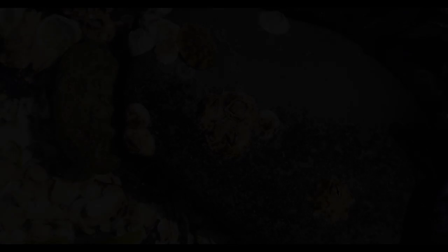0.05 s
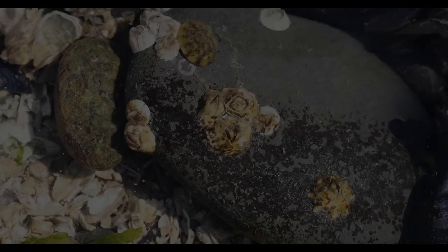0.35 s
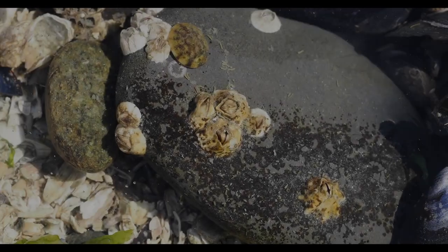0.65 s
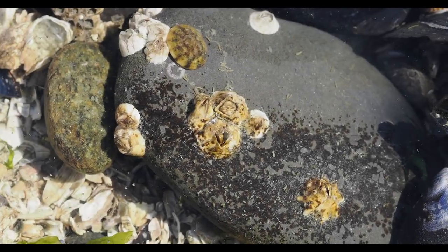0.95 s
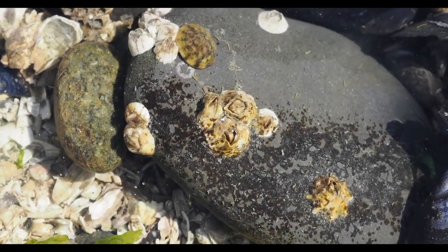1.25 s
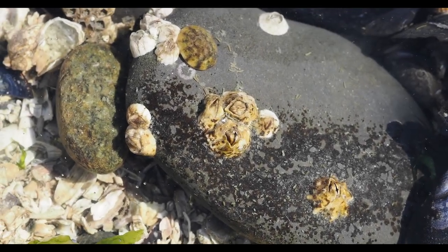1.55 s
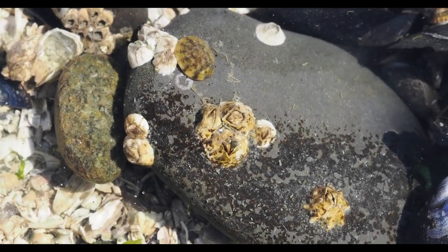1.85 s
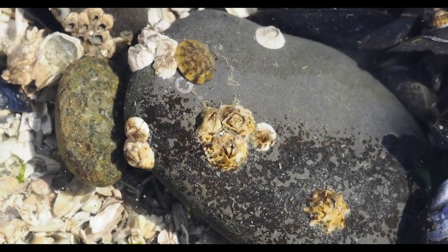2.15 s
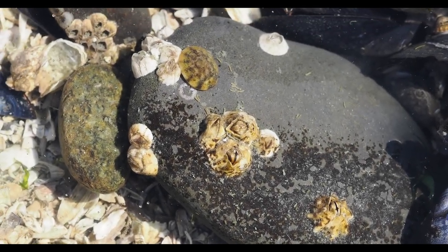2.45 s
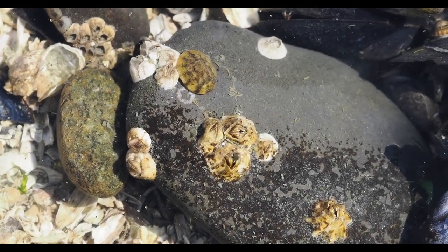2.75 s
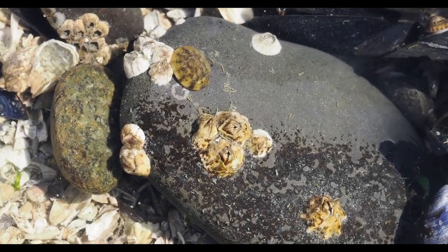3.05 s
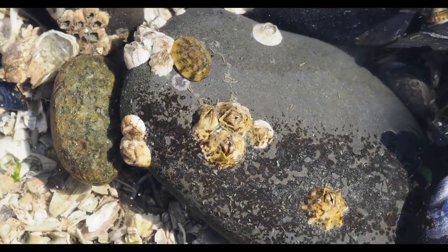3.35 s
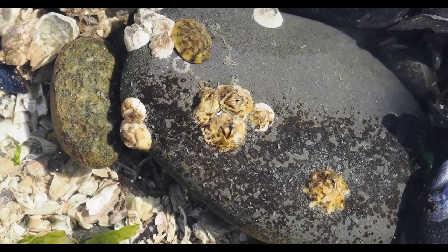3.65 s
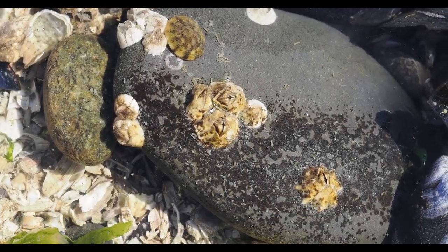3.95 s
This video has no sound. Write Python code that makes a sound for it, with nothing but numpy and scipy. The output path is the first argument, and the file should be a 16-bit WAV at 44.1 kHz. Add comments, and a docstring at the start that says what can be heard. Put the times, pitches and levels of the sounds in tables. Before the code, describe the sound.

A low wind rumble over distant sea and engine drone, with sparse clicks of wet shells.

```python
"""Wet shells click close by on a rocky shore at low tide, each a damped knock and a gritty snap, and a few
small pebbles rattle briefly with a ringing tone. Draining shells tick, fine bubbles burst in the grit, and
small waves wash softly between the stones. Light wind rumbles on the microphone, far engines drone under the
broadband rush of the sea, and a distant bird whistles once. The whole sound fades in over the first second."""
import sys
import numpy as np
from scipy import signal
from scipy.fft import rfft, irfft
from scipy.io import wavfile

SR = 44100
rng = np.random.default_rng(int(sys.argv[2]) if len(sys.argv) > 2 else 0)


def generate_wav(signal):
    """Clip the signal to [-1, 1] and save it as 16-bit WAV at the path in sys.argv[1]."""
    frames = np.transpose(np.atleast_2d(signal))
    scaled = np.clip(frames, -1, 1) * 32767
    pcm = np.round(scaled).astype(np.int16)
    wavfile.write(sys.argv[1], SR, pcm)


N = 176400
TIME = np.arange(N) / SR


def from_db(db):
    """Amplitude ratio for a level in decibels."""
    return 10 ** (np.asarray(db) / 20)


def unit_rms(x):
    """Normalisation to unit mean power."""
    return x / np.sqrt(np.mean(x ** 2) + 1e-20)


def curves(rows):
    """Linear interpolation of each column after the first, which is time."""
    seconds, *columns = np.transpose(rows)
    return [np.interp(TIME, seconds, column) for column in columns]


def panned(db):
    """Interaural level difference: two gains, the left db above the right."""
    return from_db(np.array([[db], [-db]]) / 2)


def drift(corner_hz):
    """Low-pass noise: a smooth random fluctuation of unit rms."""
    hz = np.arange(N // 2 + 1) * SR / N
    return unit_rms(irfft(rfft(rng.standard_normal(N)) / (1 + (hz / corner_hz) ** 2), N))


def noise(spectrum, width):
    """Spectrally shaped stereo noise of unit rms; width 0 is central, 1 is uncorrelated."""
    hz, db = np.transpose(spectrum)
    bins = np.arange(1, N // 2 + 2) * SR / N
    gain = from_db(np.interp(np.log(bins), np.log(hz), db))
    gain /= (1 + (hz[0] / bins / 2) ** 2) * (1 + (bins / hz[-1] / 2) ** 2)   # both ends roll off
    mid, side = irfft(rfft(rng.standard_normal((2, N))) * gain, N)
    return unit_rms(np.array([mid + width * side, mid - width * side]))


def resonance(x, hz, width_hz):
    """A two-pole resonator with unit peak gain."""
    r = np.exp(-np.pi * width_hz / SR)
    feedback = [1, -2 * r * np.cos(2 * np.pi * hz / SR), r * r]
    return signal.lfilter(np.array([1, 0, -1]) * (1 - r * r) / 2, feedback, x + 1e-18)


def decay(t, t60):
    """Exponential damping: 60 dB down after t60 seconds."""
    return np.exp(-np.log(1000) * t / t60)


def tone(hz):
    """A sinusoid whose phase is the integral of its frequency."""
    return np.sin(2 * np.pi * (np.cumsum(hz) / SR + rng.random()))


def shell_knock(t, hz, t60, rise_s=0.00042, overtone_ratio=1.164):
    """Damped free vibration: two modes of a shell give a hollow knock."""
    phase = 2 * np.pi * hz * t
    modes = np.sin(phase) + from_db(-17.5) * np.sin(overtone_ratio * phase)
    attack = 1 - np.exp(-(t / rise_s) ** 2)
    return modes * decay(t, t60) * attack


SNAP_T60_S = 0.0041
def shell_snap(t, grit, hz, q=7):
    """Transient excitation: a band-limited noise burst drives a resonance into a bright snap."""
    envelope = decay(t, SNAP_T60_S)
    edges_hz = [0.59 * hz, min(1.58 * hz, 0.45 * SR)]
    band = signal.butter(2, edges_hz, "band", fs=SR, output="sos")
    burst = signal.sosfilt(band, grit * envelope)
    snap = resonance(burst, hz, hz / q) + 0.24 * burst
    # Each channel carries the energy of the envelope.
    return snap * np.sqrt(np.sum(envelope ** 2) / np.sum(snap ** 2, axis=1, keepdims=True))


# Clicks of wet shells; the rows from 3.21 to 3.29 s are instead a brief rattle of small pebbles ringing near
# 2.6 kHz. Each row: start in seconds, knock frequency in Hz, relative knock level in dB, knock t60 in seconds,
# snap frequency in Hz, relative snap level in dB, left minus right in dB.
SHELL_CLICKS = [(1.2501, 1780, -45, .005, 11200, -48, 1), (1.2994, 1730, -40.5, 0.0077, 2640, -41, 6),
                (1.332, 1500, -60, .005, 11600, -42, 0), (1.5605, 1700, -41, 0.0071, 9300, -35.5, 2),
                (1.8776, 1270, -34, .008, 2435, -52, 1), (2.7318, 2100, -34, 0.0081, 2770, -39, -1),
                (2.7447, 1970, -27, 0.0052, 7400, -32.5, 1.5), (2.8163, 1670, -38, 0.0074, 4200, -60, 6),
                (2.8183, 1810, -43, 0.0067, 7700, -35, -5), (2.8187, 5400, -44.5, 0.0054, 5600, -46, 4),
                (2.8790, 1400, -35, .005, 7506, -38, 4), (2.9087, 6200, -41, 0.0034, 9000, -39, 5),
                (2.9236, 4420, -48, 0.0058, 8900, -36, 3), (3.0769, 3124, -46, .005, 3900, -44, 0),
                (3.0840, 1880, -25.5, 0.0074, 3000, -34, 1), (3.1452, 1810, -47, .006, 8700, -46.5, 4),
                (3.2145, 2470, -48.5, .024, 2600, -58, 5), (3.267, 2550, -48, .016, 4573, -51, 0),
                (3.2812, 2630, -46.5, .016, 8300, -51, 2), (3.2902, 2600, -46, .01, 7800, -52, 0),
                (3.3270, 1870, -41.5, 0.0093, 9100, -40.5, 3), (3.5112, 1900, -32, 0.0037, 2800, -37, -4),
                (3.5135, 3190, -39.5, .009, 8000, -43, 0), (3.5162, 2800, -35.5, .005, 10080, -27.5, 1),
                (3.5165, 4950, -42.5, 0.009, 8500, -29.5, 5), (3.6200, 1490, -47, 0.0065, 8550, -46.5, 7),
                (3.7633, 1570, -60, .006, 7800, -50, 13)]
def shell_clicks(scatter_t60_s=0.018, scatter_db=-5.5):
    """Scattering: each knock and snap is heard directly and in diffuse reflections from the stones."""
    t = TIME[:SR // 20]
    out = np.zeros((2, N + len(t)))
    for start_s, knock_hz, knock_db, knock_t60, snap_hz, snap_db, pan_db in SHELL_CLICKS:
        grit, scatter = rng.standard_normal((2, 2, len(t)))
        knock = from_db(knock_db + 1.5) * shell_knock(t, knock_hz, knock_t60)
        snap = from_db(snap_db - 3.5) * shell_snap(t, grit, snap_hz)
        direct = knock + snap
        stone_response = unit_rms(scatter * decay(t, scatter_t60_s)) / np.sqrt(len(t))
        reflected = signal.fftconvolve(direct, stone_response, axes=1)[:, :len(t)]
        start = int(start_s * SR)
        out[:, start:start + len(t)] += (direct + from_db(scatter_db) * reflected) * panned(pan_db)
    return out[:, :N]


# Ticking of draining shells. Each row: time in seconds, mean rate in ticks per second.
TICK_RATE = [(1.0, 0), (1.4, 16), (2.2, 2), (2.7, 3), (3.25, 33), (3.5, 12), (4.0, 18)]
def shell_ticks(spread_db=6.5):
    """A Poisson process: draining shells all around give faint, independent ticks."""
    rate, = curves(TICK_RATE)
    onsets = rng.random(N) < rate / SR
    strength = from_db(-56.5 + spread_db * np.clip(rng.standard_normal(N), -2, 2))
    envelope = signal.lfilter([1], [1, -decay(1 / SR, SNAP_T60_S)], onsets * strength + 1e-18)
    return resonance(envelope * rng.standard_normal((2, N)), hz=7500, width_hz=2500)


# Water draining through shell grit. Each row: time in seconds, level in dB.
FIZZ_LEVEL = [(0, -74.5), (2.65, -79.5), (2.9, -67.5), (3.1, -70), (3.18, -77), (3.29, -64.5),
              (3.42, -71.5), (3.55, -69), (3.7, -71), (3.78, -82)]
# Spectrum of the bubbles. Each row: frequency in Hz, relative spectral density in dB.
FIZZ_SPECTRUM = [(1800, -12), (2700, 4.5), (3500, 4), (4400, -1.5), (5600, -4), (8000, -4.5), (13000, -14)]
def fizz(grain_db=5):
    """Incoherent summation: fine bubbles bursting in the grit merge into a grainy noise."""
    db, = curves(FIZZ_LEVEL)
    return from_db(db + grain_db * drift(280)) * noise(FIZZ_SPECTRUM, width=1)


# Swells of the small waves. Each row: time in seconds, level in dB.
WASH_LEVEL = [(0, -75.5), (1.1, -66.5), (1.48, -69.5), (1.61, -56.5), (1.74, -62), (1.89, -56), (2.08, -67),
              (2.55, -69), (2.85, -62), (3.0, -63), (3.08, -58.5), (3.2, -63.5), (3.45, -66), (3.53, -56),
              (3.73, -62), (3.87, -55.5), (4.0, -69)]
# Spectrum of their wash. Each row: frequency in Hz, relative spectral density in dB.
WASH_SPECTRUM = [(500, -5), (950, 7.5), (1150, 4.5), (1450, 6), (1800, 4.5), (2030, 1), (2300, 4),
                 (2700, -7), (3400, -10), (5000, -33), (9000, -32)]
def wavelets(grain_db=2):
    """Amplitude-modulated noise: water swells softly between the stones, left of centre."""
    db, = curves(WASH_LEVEL)
    return from_db(db + grain_db * drift(114)) * noise(WASH_SPECTRUM, width=0.16) * panned(4.5)


# Gusts on the microphone. Each row: time in seconds, level in dB.
GUST_LEVEL = [(0, -40), (.75, -43.5), (.92, -36.5), (1.2, -47.5), (1.6, -45), (1.92, -45), (2.03, -38),
              (2.16, -49), (2.225, -29.5), (2.29, -44.5), (2.48, -38), (2.65, -53), (2.83, -37), (3.0, -51),
              (3.33, -47), (3.45, -40), (3.77, -37.5), (4.0, -33)]
# The side that the wind strikes. Each row: time in seconds, left minus right in dB.
GUST_SIDE = [(1.3, -9), (1.8, 3), (2.25, -8), (2.8, -7.5), (3.25, -1), (3.8, -8)]
# Spectrum of the rumble. Each row: frequency in Hz, relative spectral density in dB.
WIND_SPECTRUM = [(10, -11), (22, -2.5), (45, 5.5), (62, 2), (90, -5), (150, -6.5), (230, -28.5), (400, -48),
                 (900, -60)]
def wind(buffet_db=2.5, buffet_hz=10.3):
    """Turbulent pressure fluctuation: gusts buffet each microphone port on its own."""
    db, = curves(GUST_LEVEL)
    side_db, = curves(GUST_SIDE)
    buffets = np.array([drift(buffet_hz), drift(buffet_hz)])
    port_db = db + buffet_db * buffets + np.array([side_db, -side_db]) / 2
    return from_db(port_db) * noise(WIND_SPECTRUM, width=0.87)


# Spectra of the sea's rush and hiss. Each row: frequency in Hz, relative spectral density in dB.
RUSH_SPECTRUM = [(40, 7), (75, 3.5), (115, -3), (165, -5), (225, -11), (310, -7.5), (370, -12.5),
                 (430, -10), (540, -13), (760, -22.5), (880, -21.5), (1090, -31.5), (1260, -19.5),
                 (1400, -33.5), (1560, -25.5), (1850, -27), (2500, -58), (3100, -34.5), (5000, -54.5)]
HISS_SPECTRUM = [(200, 0), (450, -7.5), (750, -12), (1100, -17.5), (1350, -18.5), (1550, -6), (1760, -13.5),
                 (2050, -19), (2900, -21.5), (3700, -23.5), (4400, -23), (6400, -27.5), (7300, -24.5),
                 (8300, -22.5), (9700, -29), (12400, -25), (15500, -32)]
def sea():
    """Interaural coherence: the dull rush of open water is central, its uncorrelated hiss diffuse."""
    rush = from_db(-45 - 0.54 * drift(1.8)) * noise(RUSH_SPECTRUM, width=0.067)
    hiss = from_db(-57 + 0.93 * drift(14)) * noise(HISS_SPECTRUM, width=1)
    return rush + hiss


# A far boat engine. Each row: time in seconds, firing rate in Hz, base level in dB.
BOAT_ENGINE = [(0, 85.46, -37.5), (.6, 87.2, -49), (1.45, 86.17, -43.5), (1.65, 86.46, -36),
               (2.0, 86.54, -36), (2.3, 87.06, -53.5), (2.6, 87, -46), (3.05, 86.93, -47),
               (3.3, 86.57, -44), (3.6, 86.6, -57.5), (4.0, 87.3, -43)]
# Its partials. Each row: multiple of the firing rate, offset from the mean base level in dB,
# share of the level swing that it follows.
BOAT_ORDERS = [(1, -1, 0.75), (1.5, -16, 0.48), (2, -8, 0.15), (3, -17.5, 0.15)]
# A second engine that swells late. Each row: time in seconds, level of the fundamental in dB.
SECOND_ENGINE = [(1.1, -55.5), (1.8, -61.5), (2.4, -52), (3.4, -57.5), (3.75, -45), (4.0, -53)]
# Drone of other far machinery. Each row: frequency in Hz, level in dB.
MACHINERY = [(77.5, -53), (202.8, -52.5)]
def engines(second_hz=110.2, waver_db=1.5, pitch_wander=0.004):
    """Periodic firing gives line spectra, whose low partials waver on their way across the water."""
    firing_hz, boat_db = curves(BOAT_ENGINE)
    second_db, = curves(SECOND_ENGINE)
    mean_db = boat_db.mean()
    partials = [(order * firing_hz, mean_db + offset_db + share * (boat_db - mean_db))
                for order, offset_db, share in BOAT_ORDERS]
    partials += [(second_hz, second_db), (2 * second_hz, second_db - 12)] + MACHINERY
    out = np.zeros(N)
    for hz, db in partials:
        amplitude = np.sqrt(2) * from_db(db + waver_db * drift(1.07))
        out += amplitude * tone(hz * (1 + pitch_wander * drift(4.23)))
    return out


# One glide of a bird's whistle. Each row: time in seconds, pitch in Hz, level in dB.
WHISTLE_GLIDE = [(2.90, 2470, -72), (2.945, 2390, -63), (2.99, 2230, -66), (3.04, 2210, -62),
                 (3.08, 2270, -70)]
def bird(edge_s=0.019, flicker_db=1, pitch_wobble=0.0086):
    """Random frequency and amplitude modulation make a thin, distant whistle unsteady."""
    hz, db = curves(WHISTLE_GLIDE)
    start_s, end_s = WHISTLE_GLIDE[0][0], WHISTLE_GLIDE[-1][0]
    gate = np.clip(np.minimum(TIME - start_s, end_s - TIME) / edge_s, 0, 1)
    amplitude = gate * from_db(db + flicker_db * drift(41))
    return amplitude * tone(hz * (1 + pitch_wobble * drift(126)))


def scene():
    """Linear superposition: the pressures of all sources on the shore add."""
    return wind() + sea() + wavelets() + fizz() + engines() + shell_clicks() + shell_ticks() + bird()


FADE_START_S, FADE_S, CUTOFF_HZ = 0.036, 1.0, 15900
def record(dry):
    """Band limiting: the sound fades in and a steep low-pass filter removes the highest treble."""
    fade = np.clip((TIME - FADE_START_S) / FADE_S, 0, 1) ** 1.03
    low_pass = signal.ellip(12, .1, 80, CUTOFF_HZ, fs=SR, output="sos")
    return signal.sosfilt(low_pass, dry * fade)


dry = scene()
out = record(dry)
generate_wav(out)
```